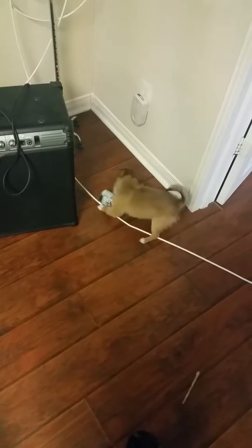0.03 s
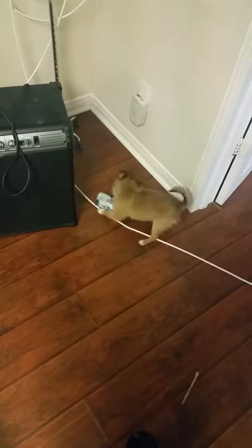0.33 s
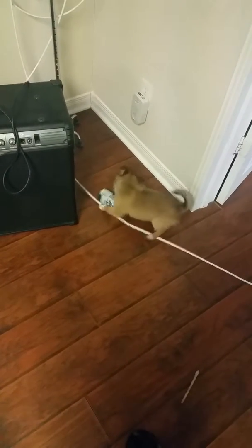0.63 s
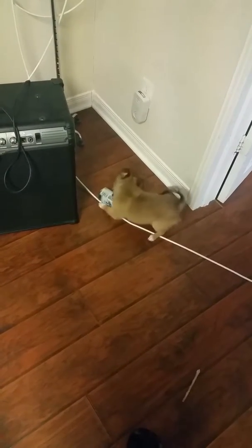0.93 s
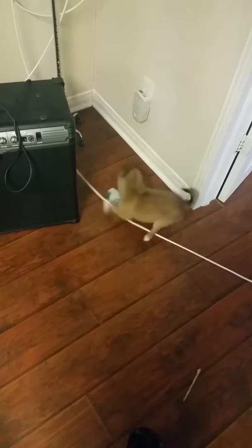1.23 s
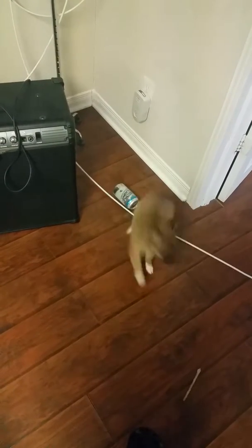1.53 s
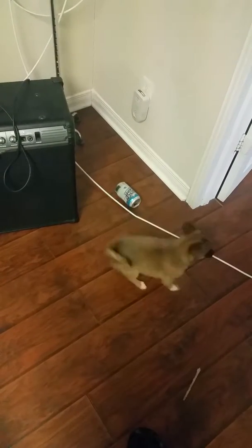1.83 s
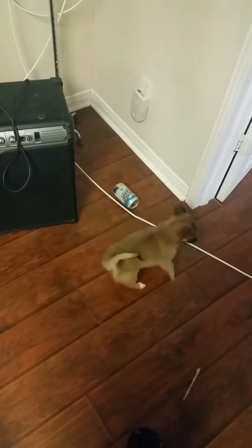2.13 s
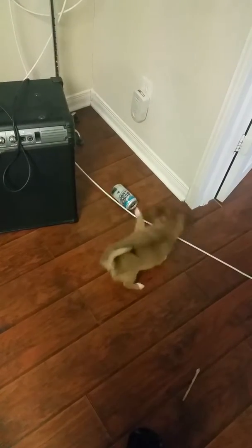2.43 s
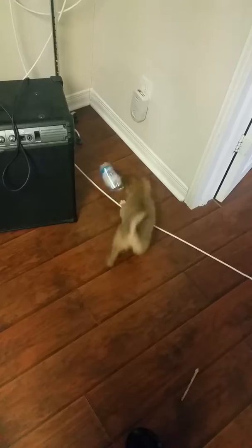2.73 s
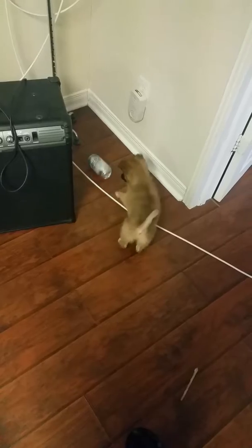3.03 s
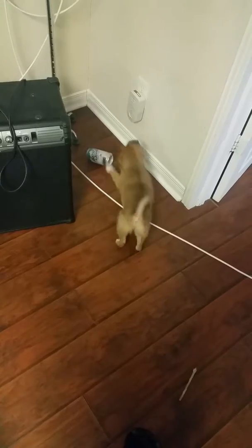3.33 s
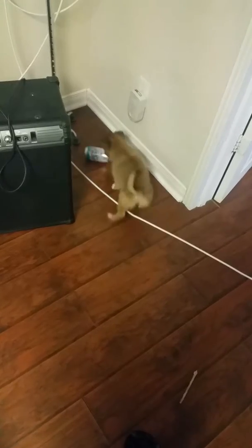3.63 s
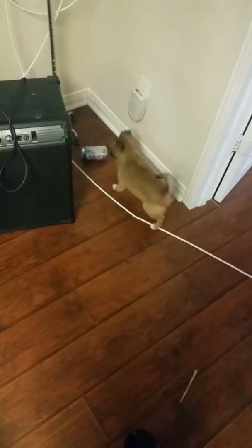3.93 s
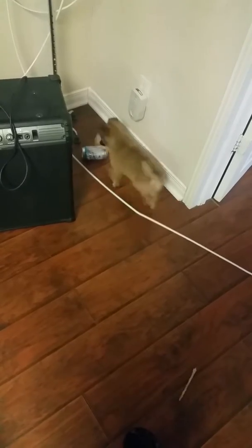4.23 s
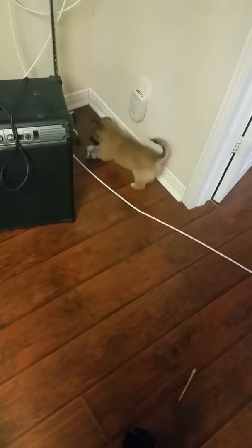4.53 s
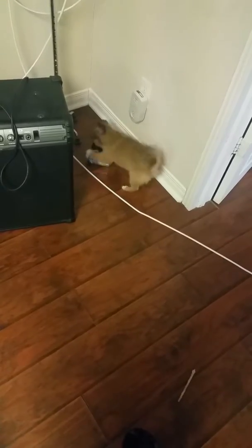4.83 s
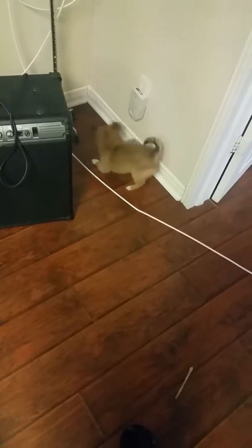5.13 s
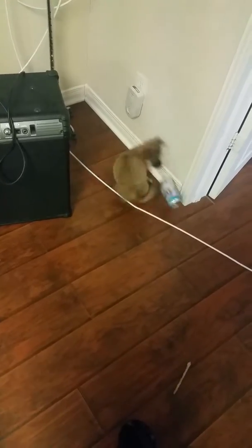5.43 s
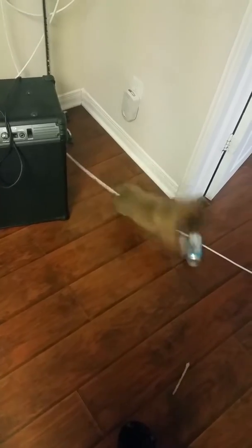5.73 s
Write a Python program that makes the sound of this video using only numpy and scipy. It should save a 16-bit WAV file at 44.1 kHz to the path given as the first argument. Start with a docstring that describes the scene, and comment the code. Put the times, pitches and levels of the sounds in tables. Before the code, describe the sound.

In a small room with a faint electrical hum, the thin wall of an empty can ticks and crackles as a little dog chews it. Paws patter lightly, then the can clacks across the wooden floor with a short metallic ring and rolls to rest. The dog nudges it in quiet scrapes, thumps around and sends it clattering again. Everything is heard from a short distance.

```python
"""Puppy with a drink can

A puppy chews and bats an empty can on floor boards in the corner of a small room. The thin wall snaps
and ticks under teeth, muzzle or claw; dropped, the can clatters, skids and rings at rim and hollow.
Paws patter and the can scuffs along the boards, over low room noise and mains hum."""
import sys
import numpy as np
from scipy import signal
from scipy.fft import rfft, irfft
from scipy.io import wavfile

SR = 44100
rng = np.random.default_rng(int(sys.argv[2]) if len(sys.argv) > 2 else 0)


def wav_out(sig):
    """Save sig, one row per channel (or a flat mono array), as 16-bit PCM at SR to the path in sys.argv[1]."""
    wavfile.write(sys.argv[1], SR, np.round(np.clip(np.atleast_2d(sig).T, -1, 1) * 32767).astype(np.int16))


N = 260190

# modes (frequency [Hz], level [dB], t60 [s])
WALL_MODES = [(1166, 4.5, 0.0054), (1450, 7.5, 0.0061), (1638, 10, 0.024), (1730, -10.5, 0.028),
              (2190, 1, 0.033), (2220, -3.5, 0.018), (2570, 1.5, 0.031), (2896, -6.5, 0.0069),
              (3170, -4, 0.0022), (3610, -6, 0.0051)]
BASE_MODES = [(480, -10, 0.04), (595, -13, 0.025), (805, 5.5, 0.0062), (896, -12.5, 0.02),
              (1043, -1.5, 0.013), (1198, -5.5, 0.011), (1410, -25, 0.024)]  # can base on the boards
HOLLOW_MODES = [(324, -5, 0.023), (363, -3.5, 0.097), (393, -24, 0.019), (467, -9.5, 0.043)]  # air swinging through the opening
RIM_MODES = [(1110, -21, .18), (1634, -14, 0.25), (1678, -10, 0.3), (2200, -19, .12), (2540, 2, .13),
             (2740, -15, .14), (3470, -12, .09), (4950, 7, 0.055), (5170, 6, .1), (5205, 6.5, 0.11),
             (5260, -5, 0.083), (8150, -6, 0.063), (7920, -4, 0.061)]  # rim and lid; dents split modes into beating pairs
BOARD_MODES = [(91.5, -24.5, 0.36), (149, 2, 0.051), (214, -10, 0.086), (316, 0, 0.17), (426.2, 4, 0.12),
               (598, 1, 0.016), (864, -3, 0.018)]  # under a paw
FLOOR_MODES = [(81, -18, 0.16), (106, 11, 0.11), (130, 1, 0.11), (165, -6, 0.037), (250, 7, 0.06)]  # under the dog's whole weight

# spectra (frequency [Hz], density [dB])
CRACKLE_SPECTRUM = [(200, -43), (1500, -9), (3000, -3), (4200, -0.5), (5300, -1), (6800, -4), (8200, -2),
                    (10000, -8), (12500, -4), (14500, -16), (16000, -17.5)]
SLIDE_SPECTRUM = [(100, -5.5), (600, 4.5), (1000, 2), (1900, -3.5), (2400, -1.5), (3700, -1.5),
                  (5200, -4.5), (8000, -4.5), (12000, -2.5), (14500, -8.5), (16000, -13)]
AIR_SPECTRUM = [(15, -90), (25, -21), (59, -5.5), (87, -14.5), (120, -1.5), (223, -1.5), (309, -7),
                (363, -6.5), (439, -6), (714, -8), (1560, -17), (3620, -24.5), (4030, -29), (11000, -38.5),
                (16000, -38)]

# snaps and ticks of the can wall, from teeth, a muzzle bump or a claw (time [s], contact [ms],
# level [dB], base re level [dB], crackle re level [dB], wall tilt [dB/octave])
SNAP_TICK_EVENTS = [(0.3107, 2.8, -24, -11, -15, 23), (0.3813, 4.2, -25, -3, -30, -6),
                    (0.4064, 3.6, -29.5, -28, 6.5, 5.5), (0.4605, 7.6, -20.5, -6, -12, 1),
                    (0.489, 5.1, -28, -17, -7.5, 9), (0.6032, 2.8, -25.5, -17, -30, 11),
                    (0.6573, 3, -21, -13.5, -13, 5), (0.6841, 3.4, -26.5, -21, -11.5, 20),
                    (0.8184, 2.8, -21.5, -13, -10, 14.5), (0.8868, 4.8, -17.5, -5.5, -10.5, 8),
                    (0.9431, 6.3, -21, -0.5, -30, -1), (0.9621, 3.8, -25, -16, -9.5, 9),
                    (1.0996, 3.3, -31, -14, -30.5, -1), (1.119, 6.5, -17, -21.5, -11.5, 6),
                    (1.2419, 3, -16.5, -12.5, -16.5, 5.5), (1.2885, 4.9, -27.5, -2.5, 7.5, 4),
                    (4.362, 8.3, -32, -1, 1.5, 7), (4.4567, 3.3, -44, 5, 8, 18),
                    (4.745, 11, -41, -4, -4, 20)]
# floor hits (time [s], contact [ms], level [dB], landing [0 flat, 1 on rim], crackle re level [dB])
KNOCK_EVENTS = [(2.758, 11, -16.5, 0.58, -8), (2.9409, 2.6, -20, 0.88, -13.5),
                (3.0317, 3.9, -15.5, 0.91, -17), (3.1392, 4.9, -13.5, 0.19, -9.5),
                (3.2185, 4.3, -20, 0.11, -20), (3.249, 5.4, -23, .4, -19), (3.37, 4.1, -21.5, 0.088, -10.5),
                (5.0429, 5.3, -24, .4, -15.5), (5.1793, 1.6, -16, 0.28, -22), (5.1908, 2, -21, .2, -14.5),
                (5.245, 11, -21.5, 0.42, -17), (5.485, 3.3, -15, 0.93, -19), (5.626, 1.4, -16, 0.65, -11.5),
                (5.7213, 2.2, -24, 0.56, -17.5), (5.8335, 0.34, -23, .15, -17.5)]
# skids (time [s], contact [ms], level [dB], landing [0 flat, 1 on rim])
SKID_EVENTS = [(0.0, 6.8, -36, 0.31), (2.772, 11, -21.5, 0.17), (3.159, 45, -25, 0.4),
               (5.51, 9.9, -19, 0.44)]
# paw or muzzle shoves (time [s], level [dB], crackle re level [dB])
NUDGE_EVENTS = [(0.3582, -34, -24), (1.374, -34, -3.5), (2.729, -23.5, -9), (4.873, -43.5, -20),
                (5.029, -34.5, -5.5)]
# dents tapping in a roll (time into turn [s], level [dB])
DENT_TAPS = [(0, -28.5), (.068, -24)]
# sliding strokes (time [s], length [s], level [dB])
PUSH_EVENTS = [(0.198, 0.044, -43.5), (4.283, 0.03, -43), (4.587, 0.11, -41), (4.671, .11, -43.5),
               (4.784, 0.054, -43), (4.937, 0.091, -39), (5.102, .068, -40), (5.308, 0.042, -31),
               (5.801, 0.028, -43), (5.882, .034, -43)]
# paw steps (time [s], pad [dB], claws [dB])
STEP_EVENTS = [(1.42, -39, -56), (1.64, -48, -47.5), (2.03, -55, -56), (2.431, -42, -47),
               (3.766, -54, -47.5), (3.913, -49, -51), (4.363, -28.5, -53), (4.557, -48, -65),
               (5.03, -28.5, -43)]
# body thumps as the dog wheels round (time [s], level [dB])
THUMP_EVENTS = [(5.184, -29.5), (5.243, -27.5), (5.295, -35)]

# room tail (frequency [Hz], energy re direct [dB], t60 [s])
ROOM_TAIL = [(100, -8.5, 0.27), (347, 1, 0.45), (690, 3, 0.35), (1520, 1, 0.42), (2810, 0, 0.52),
             (5900, 2, 0.36), (10000, -2.5, 0.36), (16000, -5, 0.35)]
# wall and ceiling echoes (delay [s], level [dB])
ROOM_ECHOES = [(.0028, -3.5), (.0052, -3.5), (0.0108, -13.5), (0.0226, -15.5)]
# mains hum and electrical whine (frequency [Hz], rms level [dB])
HUM_TONES = [(60, -78), (120, -58), (240, -64.5), (3360, -70.5), (3480, -69.5), (3600, -85), (3720, -69),
             (3840, -72.5)]

FLAT_DB, ON_RIM_DB = (-27, -32), (-6.5, -13)  # landings (hollow re level [dB], rim re level [dB])
SOFT_RIM_DB = -24  # rim re level in snaps, ticks and nudges
DENT_TOP_HZ = 2470  # pitch of the smallest dents
FLOOR_SPOTS = 7


def snaps_and_ticks():
    """The thin wall snaps or ticks under teeth, muzzle or claw; floor pressure adds base and hollow."""
    for time_s, ms, db, push_db, crackle_db, tilt_db_oct in SNAP_TICK_EVENTS:
        yield time_s, can(ms, rattle=.03, tilt_db_oct=tilt_db_oct, wall_db=db, base_db=db + push_db,
                          hollow_db=db + push_db - 6, crackle_db=db + crackle_db,
                          rim_db=db + SOFT_RIM_DB)


def knocks(hard_db=-15, wall_growth=.98):
    """The base clacks on the boards; hard knocks flex the wall too."""
    for time_s, ms, db, on_rim, crackle_db in KNOCK_EVENTS:
        hollow_db, rim_db = db + landing_db(on_rim)
        wall_db = db + wall_growth * (db - hard_db)
        yield time_s, can(ms, rattle=.024, tilt_db_oct=-23.5, wall_db=wall_db, base_db=db,
                          hollow_db=hollow_db, crackle_db=db + crackle_db, rim_db=rim_db)


def skids():
    """A dense, fading run of touches; scrapes most when the can lies flat."""
    for time_s, ms, db, on_rim in SKID_EVENTS:
        hollow_db, rim_db = db + landing_db(on_rim)
        yield time_s, can(ms, rattle=.67, tilt_db_oct=-5, wall_db=db + .5, base_db=db - 4,
                          hollow_db=hollow_db, crackle_db=db - 2.5 - 25 * on_rim, rim_db=rim_db)


def nudges():
    """A soft shove squeezes the air in the can and hardly rings the metal."""
    for time_s, db, crackle_db in NUDGE_EVENTS:
        yield time_s, can(ms=14.7, rattle=.08, tilt_db_oct=1, wall_db=db - 21, base_db=db - 9.5,
                          hollow_db=db, crackle_db=db + crackle_db, rim_db=db + SOFT_RIM_DB)


def roll(start_s=3.446, turn_s=.157, turns=2, loss_db_per_turn=6):
    """The can rolls to rest; each dent taps once a turn, weaker each time."""
    for turn in range(turns):
        for offset_s, dent_db in DENT_TAPS:
            db = dent_db - loss_db_per_turn * turn
            tap = can(ms=6.7, rattle=.24, tilt_db_oct=14, wall_db=db - 13, base_db=db,
                      hollow_db=db - 13, crackle_db=db - 14, rim_db=db - 40)
            yield start_s + turn_s * turn + offset_s, tap


def landing_db(on_rim):
    """Relative hollow and rim levels; both rise as the landing nears the rim."""
    return np.array(FLAT_DB) + on_rim * np.subtract(ON_RIM_DB, FLAT_DB)


def can(ms, rattle, tilt_db_oct, wall_db, base_db, hollow_db, crackle_db, rim_db):
    """One contact drives wall, base, hollow and rim, and sheds a bright crackle."""
    force = contact(ms, rattle)
    blunt_force = butter(force, 3300, "low", order=6)
    # small dents favour the upper wall modes, broad dents the lower
    dent_modes = [(hz, db + tilt_db_oct * np.log2(min(hz, DENT_TOP_HZ) / WALL_MODES[0][0]), t60_s)
                  for hz, db, t60_s in WALL_MODES]
    wall = unit_attack(butter(ring(blunt_force, dent_modes, detune=.044), 800, "high"))
    base = unit_attack(butter(ring(blunt_force, BASE_MODES, detune=.067), 300, "high"))
    hollow = unit_attack(butter(ring(blunt_force, HOLLOW_MODES, detune=.0086), 300, "high"))
    spinning_rim = ring(force, RIM_MODES, detune=.0021) * tumble(len(force))
    rim = unit_attack(butter(spinning_rim, 800, "high"))
    gains = from_db([wall_db, base_db, hollow_db, crackle_db, rim_db])
    return -from_db(-2.5) * gains @ np.array([wall, base, hollow, crackle(ms, rattle), rim])


def contact(ms, rattle=0, chatter=.46, clicks_per_s=3000, rattle_s=.047):
    """Contact force: one impulse, a quick run of smaller ones, a fading rattle."""
    t = np.arange(SR // 3) / SR
    clicks = rng.standard_normal(len(t)) * (rng.random(len(t)) < clicks_per_s / SR)
    buckling = np.exp(-(t * 1000 / ms) ** 4)
    force = clicks * (chatter * buckling + rattle * np.exp(-t / rattle_s))
    force[0] = 1
    return force


def ring(force, modes, detune):
    """Damped modes; each blow lands elsewhere, so strengths and pitches vary."""
    out = 0
    for (hz, db, t60_s), (bend, strength) in zip(modes, rng.standard_normal((len(modes), 2))):
        radius = np.exp(-np.log(1000) / (t60_s * SR))
        angle = 2 * np.pi * hz * (1 + detune * bend) / SR
        mode = signal.lfilter([1, 0, -1], [1, -2 * radius * np.cos(angle), radius ** 2], force + 1e-18)
        out = out + from_db(db + 2 * strength) * unit_attack(mode)
    return unit_attack(out)


def crackle(ms, rattle, grains_per_s=5000, spread_ms=2):
    """Tiny uneven creases run through the metal after a contact."""
    t_ms = np.arange(SR // 3) / SR * 1000
    grains = rng.laplace(size=len(t_ms)) * (rng.random(len(t_ms)) < grains_per_s / SR)
    swell = (1 - np.exp(-2 * t_ms)) * np.exp(-(t_ms / (ms + spread_ms)) ** 2)
    settling = rattle * np.exp(-t_ms / 25)
    return unit_attack(coloured(grains * (swell + settling), CRACKLE_SPECTRUM))


def tumble(size, depth=.99, knots_per_s=70):
    """Random gain dips: a spinning can beams its ring away and back."""
    knots = np.r_[0, np.abs(rng.standard_normal(256))]
    dips = np.interp(np.arange(size) / SR * knots_per_s, np.arange(len(knots)), knots)
    return np.exp(-depth * dips)


def pushes():
    """The can slides along the boards in short strokes."""
    for time_s, length_s, db in PUSH_EVENTS:
        yield time_s, scuff(length_s, db)


def scuff(length_s, db, slips_per_s=6300):
    """Sliding friction: a swell of tiny slips."""
    size = int(length_s * SR)
    slips = rng.standard_normal(SR)[:size] * (rng.random(SR)[:size] < slips_per_s / SR)
    hiss = coloured(slips * signal.windows.tukey(size, .5), SLIDE_SPECTRUM)
    return from_db(db - 4.5) * hiss / rms(hiss)


def dog(pad_hz=1180, body_hz=404, claw_s=.016, patter_start_s=2, patter_step_s=.21):
    """Pads thud, claws slip, light steps patter; the body shakes floor and boards."""
    for time_s, pad_db, claw_db in STEP_EVENTS:
        yield time_s, thud(pad_db, BOARD_MODES, pad_hz)
        yield time_s, scuff(claw_s, claw_db)
    for step in range(4):
        time_s = patter_start_s + patter_step_s * (step + rng.uniform(-.1, .101))
        yield time_s, thud(-56, BOARD_MODES, pad_hz)
    for time_s, db in THUMP_EVENTS:
        yield time_s, thud(db, FLOOR_MODES, body_hz) + thud(db + 5, BOARD_MODES, pad_hz)


def thud(db, modes, cutoff_hz):
    """A blow on the floor, softened by pads or fur."""
    wood = ring(contact(ms=14.3), modes, detune=.042)
    return from_db(db - 1.5) * butter(wood, [85, cutoff_hz], "band")


def room(track, build_s=.0071, left_lead_s=.0004, size=32768):
    """One spot's path: direct sound, left first; early echoes; a tail decaying band by band."""
    t = np.arange(size) / SR
    hz, noise = diffuse_spectrum(size, apart_hz=525)
    edges_hz = np.r_[0, np.geomspace(140, SR / 2, 13)]
    build_up = 1 - np.exp(-(t / build_s) ** 2)
    response = np.zeros((2, size))
    for low_hz, high_hz in zip(edges_hz, edges_hz[1:]):
        centre_hz = (low_hz + high_hz) / 2
        t60_s = at_hz(ROOM_TAIL, centre_hz, column=2)
        band = irfft(noise * ((hz >= low_hz) & (hz < high_hz)), size)
        tail = band * np.exp(-np.log(1000) * t / t60_s) * build_up
        direct_rms = np.sqrt(2 * (high_hz - low_hz) / SR / size)  # unit impulse in this band
        response += from_db(at_hz(ROOM_TAIL, centre_hz)) * direct_rms * tail / rms(tail)
    lead_s = left_lead_s * (1 + .06 * rng.uniform(-1, 1))
    response[[0, 1], [0, round(lead_s * SR)]] += 1
    for delay_s, db in ROOM_ECHOES:
        arrivals_s = delay_s * rng.uniform(.85, 1.15) + rng.uniform(0, 2 * left_lead_s, 2)
        response[[0, 1], (arrivals_s * SR).astype(int)] += from_db(db)
    return signal.oaconvolve(track[None], response, axes=1)[:, :N]


def background(air_db=-45.5):
    """Steady room noise, mains hum and a thin electrical whine."""
    hz, noise = diffuse_spectrum(N, apart_hz=510)
    air = irfft(noise * from_db(at_hz(AIR_SPECTRUM, hz)), N)
    t = np.arange(N) / SR
    hum = sum(np.sqrt(2) * from_db(db) * np.sin(2 * np.pi * (tone_hz * t + rng.random()))
              for tone_hz, db in HUM_TONES)
    return from_db(air_db) * air / rms(air) + hum


def diffuse_spectrum(size, apart_hz, treble_coherence=.019):
    """Frequencies and stereo spectrum of diffuse noise, coherent in the bass."""
    hz = np.arange(size // 2 + 1) * SR / size
    coherence = treble_coherence + (1 - treble_coherence) / (1 + (hz / apart_hz) ** 4)
    mid, side = rfft(rng.standard_normal((2, size)))
    return hz, np.sqrt(1 + coherence) * mid + np.sqrt(1 - coherence) * side * [[1], [-1]]


def deal_to_spots(events):
    """Deal (time [s], sound) pairs in turn to one track per floor spot."""
    tracks = np.zeros((FLOOR_SPOTS, N))
    for k, (time_s, sound) in enumerate(events):
        start = int(time_s * SR)
        tracks[k % FLOOR_SPOTS, start:start + len(sound)] += sound[:N - start]
    return tracks


def coloured(x, spectrum, size=1024):
    """Minimum-phase filter with the given spectrum."""
    hz = np.linspace(0, SR / 2, size // 2 + 1)
    cepstrum = irfft(np.log(from_db(at_hz(spectrum, hz))))
    causal_fold = np.r_[1, np.full(size // 2 - 1, 2), np.zeros(size // 2)]
    response = irfft(np.exp(rfft(cepstrum * causal_fold)))
    return signal.fftconvolve(x, response)[:len(x)]


def butter(x, hz, kind, order=2):
    """Causal, maximally flat filter."""
    return signal.sosfilt(signal.butter(order, hz, kind, fs=SR, output="sos"), x)


def at_hz(table, hz, column=1):
    """Interpolate a column over log frequency."""
    table = np.array(table)
    return np.interp(np.log(np.maximum(hz, 1)), np.log(table[:, 0]), table[:, column])


def unit_attack(x):
    """Scale to rms 1 over the first 15 ms."""
    return x / rms(x[:int(.015 * SR)])


def from_db(db):
    """Decibels to gain."""
    return 10 ** (np.asarray(db) / 20)


def rms(x):
    """Root mean square."""
    return np.sqrt(np.mean(x ** 2) + 1e-20)


def scene(right_db=.65):
    """Can and dog over the background; each floor spot has its own room response."""
    sources = (snaps_and_ticks, knocks, skids, nudges, roll, pushes, dog)
    tracks = sum(deal_to_spots(source()) for source in sources)
    return sum(room(track) for track in tracks) * from_db([[0], [right_db]]) + background()


def record(dry, low_hz=36, high_hz=16000):
    """Soft-clip the peaks; cut deep bass and top."""
    rounded = .95 * np.tanh(dry / .95)
    lean = butter(rounded, low_hz, "high")
    return signal.sosfilt(signal.ellip(10, .1, 80, high_hz, fs=SR, output="sos"), lean)


dry = scene()
out = record(dry)
wav_out(out)
```